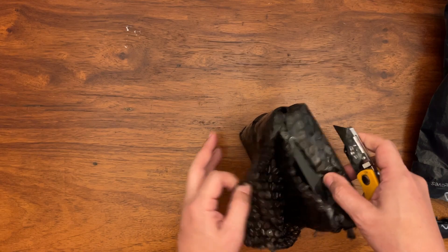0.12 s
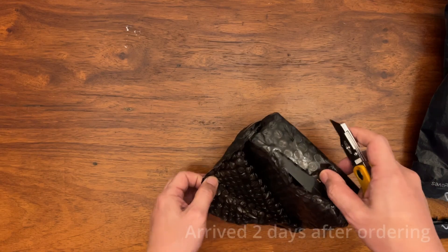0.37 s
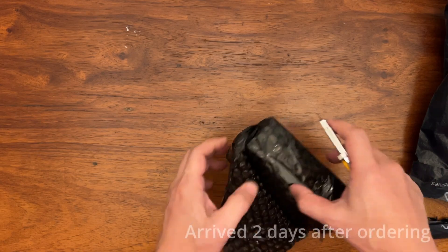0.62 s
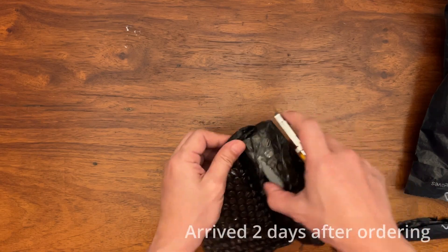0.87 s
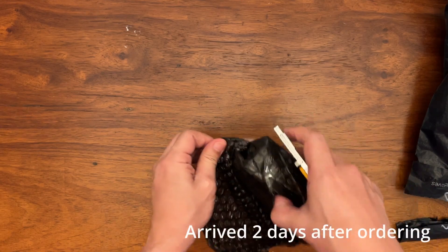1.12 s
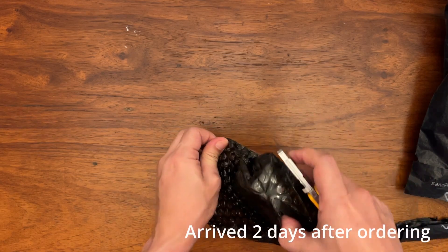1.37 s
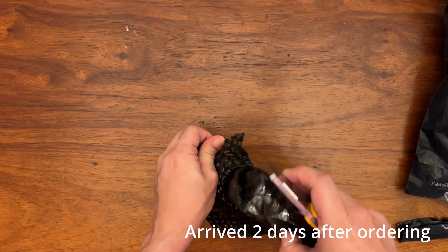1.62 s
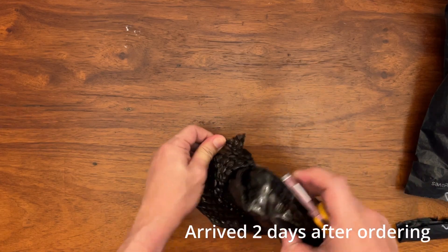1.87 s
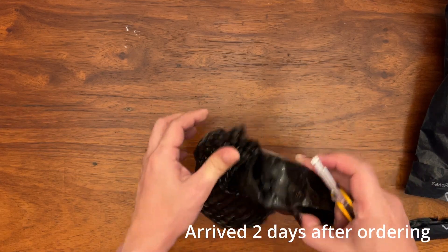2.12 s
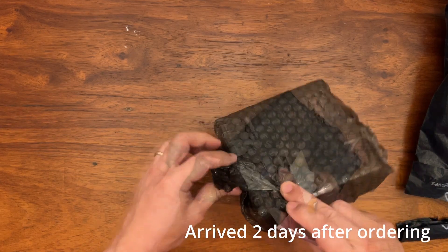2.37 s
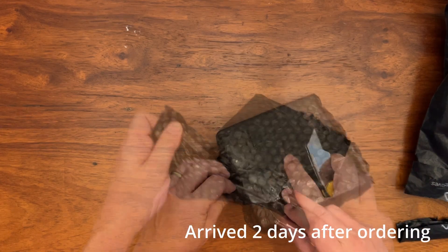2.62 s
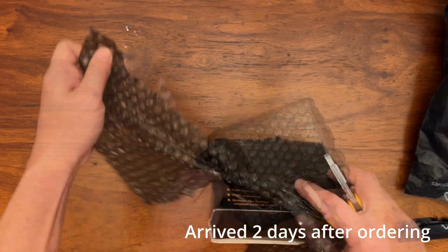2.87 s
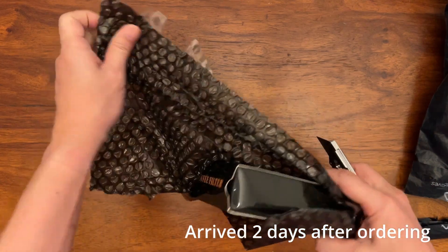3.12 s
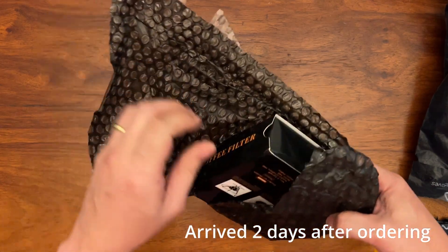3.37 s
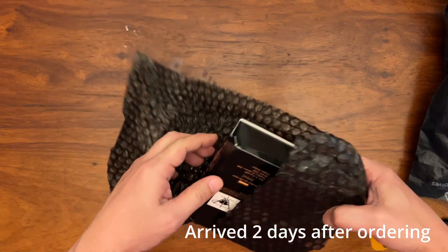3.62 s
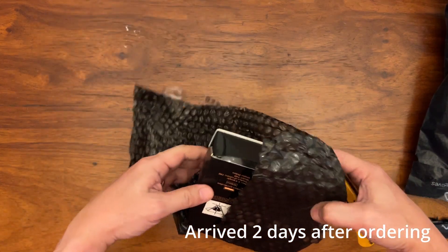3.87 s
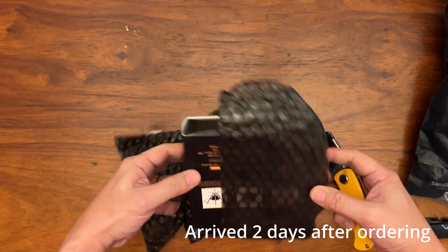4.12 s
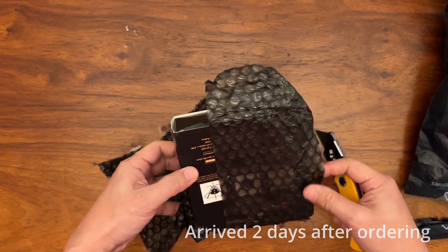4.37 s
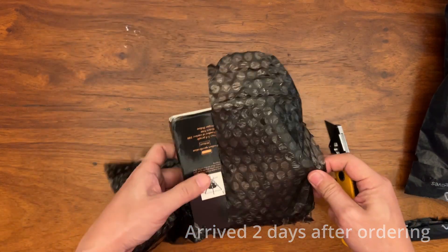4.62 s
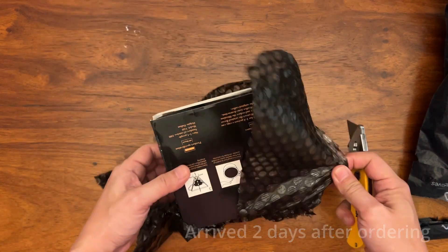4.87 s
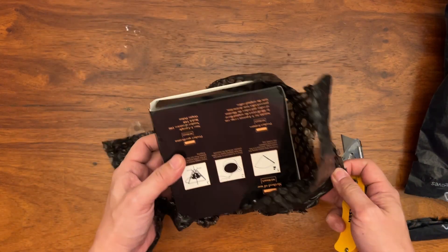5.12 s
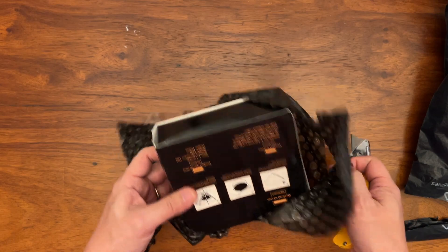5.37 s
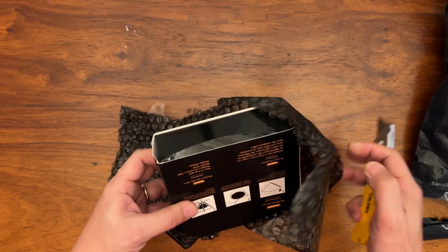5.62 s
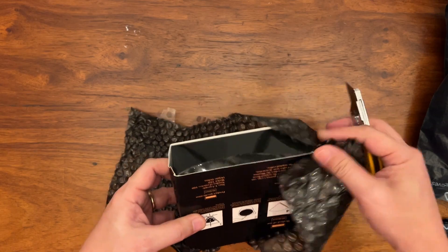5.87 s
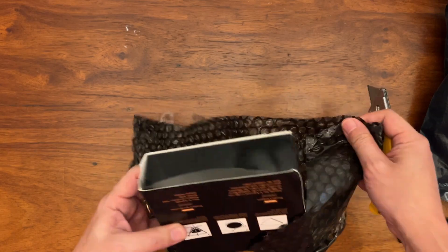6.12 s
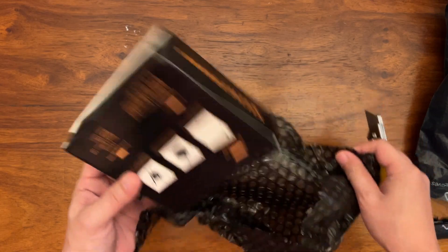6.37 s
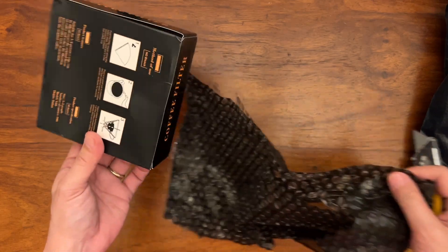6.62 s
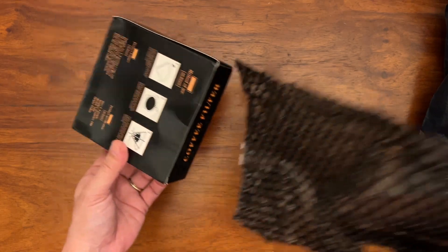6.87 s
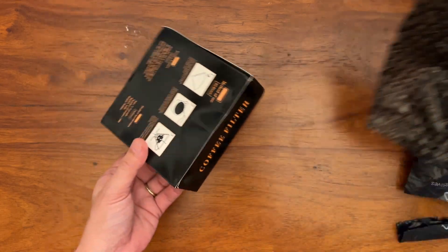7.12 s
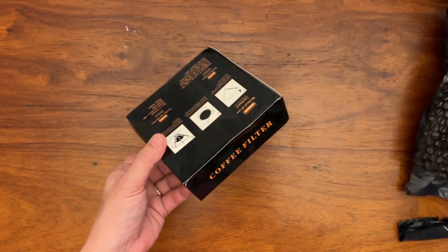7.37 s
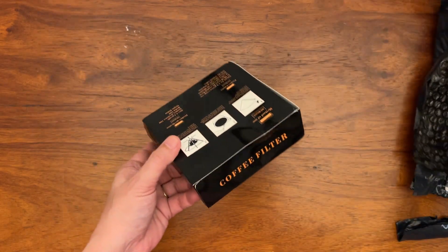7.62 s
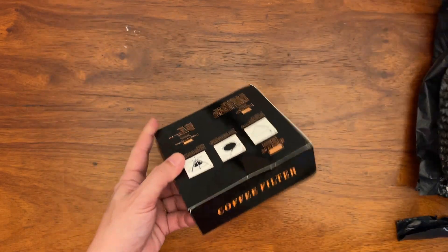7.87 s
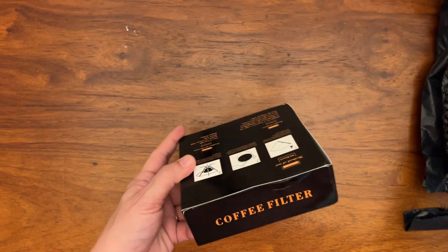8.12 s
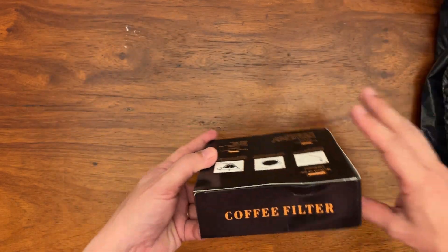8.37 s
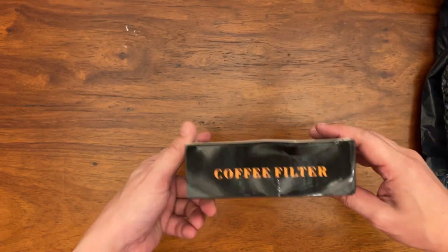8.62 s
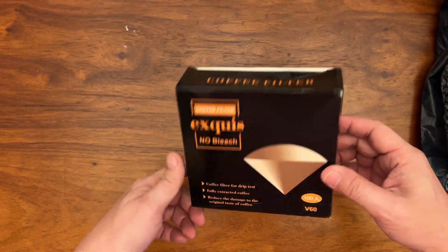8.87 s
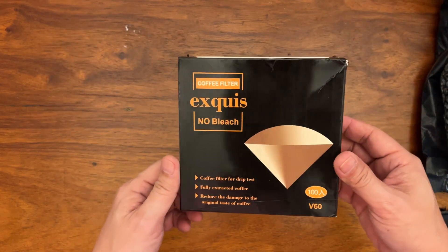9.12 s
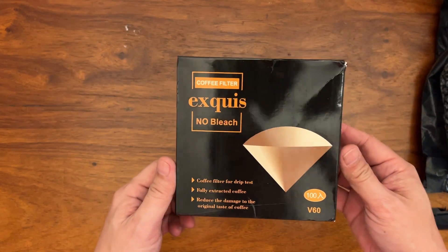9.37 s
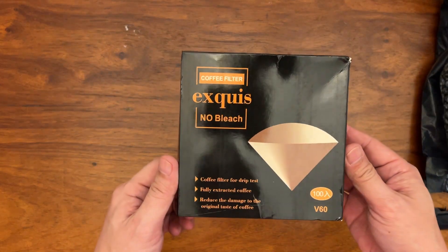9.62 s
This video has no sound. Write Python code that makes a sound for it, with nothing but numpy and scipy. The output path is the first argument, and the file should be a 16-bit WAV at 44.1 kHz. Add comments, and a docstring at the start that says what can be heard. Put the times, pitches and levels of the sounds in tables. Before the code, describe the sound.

Close, sharp crackling of plastic wrapping pulled from a small box, easing into faint rustles and light cardboard thumps in a quiet humming room.

```python
"""A quiet room with a low appliance drone, heard by a close stereo phone microphone: filtered noise.
Hands tear bubble-lined film off a cardboard box above a wooden table, drop the film aside, turn the box over.
Film creases snap singly (shaped noise bursts) and in dense swarms (random clicks through flick shapes).
Snaps, taps and slips set the hollow box thumping (decaying sines); rubbed folds squeak (narrow-band noise)."""
import sys
import numpy as np
from scipy import signal
from scipy.fft import rfft, irfft, next_fast_len
from scipy.io import wavfile
from scipy.ndimage import map_coordinates

SR = 44100
rng = np.random.default_rng(int(sys.argv[2]) if len(sys.argv) > 2 else 0)


def transcribe(u):
    """Save the signal u as a 16-bit wav file named by the first command-line argument.

    u: samples, shape (n,) or (channels, n), limited to [-1, 1]; the rate is SR.
    q: integer samples, one column per channel.
    """
    v = np.clip(np.atleast_2d(u).T, -1, 1)
    q = np.round(v * 32767).astype(np.int16)
    wavfile.write(sys.argv[1], SR, q)


def volts_from_db(level):
    """Convert decibel levels to linear amplitude ratios."""
    exponent = np.asarray(level, float) / 20
    return 10 ** exponent


N = 429964


def rms_one(x):
    """Scale to unit rms."""
    return x / np.sqrt(np.mean(x ** 2) + 1e-20)


def in_time(rows):
    """Columns of a table as curves, one value a sample."""
    s, *columns = np.transpose(rows)
    return [np.interp(np.arange(N) / SR, s, column) for column in columns]


def at_hz(points, hz, axis=1):
    """A table read on a log frequency axis."""
    points = np.array(points)
    return np.interp(np.log(hz + 1), np.log(points[:, 0]), points[:, axis])


def through(x, response):
    """Filter by a response given as a function of Hz."""
    size = next_fast_len(x.shape[-1] + SR)
    hz = np.arange(size // 2 + 1) * SR / size
    return irfft(rfft(x, size) * response(hz), size)[..., :x.shape[-1]]


def band(x, low_hz, high_hz):
    """Causal band-pass."""
    sos = signal.butter(2, [low_hz, high_hz], "band", fs=SR, output="sos")
    return signal.sosfilt(sos, x)


def drift(corner_hz):
    """Slow chance with spread 1: noise through two equal poles, run at SR / 20."""
    pole = np.exp(-40 * np.pi * corner_hz / SR)
    noise = rng.standard_normal(N // 20 + 2002)
    slow = signal.lfilter([1], [1, -2 * pole, pole * pole], noise)[2000:]
    return np.interp(np.arange(N) / 20, np.arange(len(slow)), rms_one(slow))


def pair(mid, side, likeness):
    """Two sides from two unrelated signals, as alike as the table says."""
    alike = lambda hz: np.clip(at_hz(likeness, hz), 0, 1)
    common = through(mid, lambda hz: np.sqrt(1 + alike(hz)))
    opposed = through(side, lambda hz: np.sqrt(1 - alike(hz)))
    return common + opposed * [[1], [-1]]


# room noise spectrum: (frequency [Hz], relative density [dB per Hz])
AIR_SPECTRUM = [(12, -37.5), (20, -8.5), (54, -3), (171, -3.5), (225, -11.5), (298, -11), (491, -17.5),
                (1300, -25.5), (4070, -37), (4550, -34), (10200, -57), (13100, -42), (15500, -59.5)]
# narrow hums and one thin hiss: (centre [Hz], full width at half amplitude [Hz], rms level [dB])
HUMS = [(72, 12, -72), (129.5, 15, -74), (175.5, 7.1, -74), (299.6, 4.4, -74.5), (4550, 190, -89)]
# left-right likeness of the air: (frequency [Hz], correlation [0..1])
AIR_LIKENESS = [(200, 0.9), (400, .75), (700, .05)]
# lowest air swells as the film is waved about: (time [s], relative level [dB])
RUMBLE_SWELL = [(0.0, -102), (2.55, -68), (2.74, -57), (4.43, -67.5), (9.53, -61), (9.75, -72.5)]


def air():
    """Broad room noise plus narrow hums and a swelling rumble, alike on both sides only in the bass."""
    noise = pair(*rng.standard_normal((2, N)), AIR_LIKENESS)
    out = volts_from_db(-67) * rms_one(through(noise, lambda hz: volts_from_db(at_hz(AIR_SPECTRUM, hz))))
    for centre_hz, width_hz, level_db in HUMS:
        hum = through(noise, lambda hz: 1 / (1 + (2 * (hz - centre_hz) / width_hz) ** 2))
        out = out + volts_from_db(level_db) * rms_one(hum)
    swell_db, = in_time(RUMBLE_SWELL)
    rumble = band(pair(*rng.standard_normal((2, N)), AIR_LIKENESS), 22, 99)
    return out + volts_from_db(swell_db - 4) * rms_one(rumble)


def bursts(count, envelope_t60_s, rise_s, evenness):
    """Flick of one crease, one a row: enveloped noise, spectrum partly evened, then faded by the root envelope."""
    t = np.arange(1024) / SR
    swell = (1 - np.exp(-t / rise_s)) ** 2 * volts_from_db(-60 * t / envelope_t60_s)
    tones = rfft(rng.standard_normal((count, 1024)) * swell)
    evened = tones / np.abs(tones) ** np.clip(evenness, 0, 1)
    return irfft(evened) * np.sqrt(swell)


# box modes: (frequency [Hz], relative level [dB], t60 [s])
BOX_MODES = [(226, 0.5, 0.03), (297.3, -2, 0.034), (392.3, 1.5, 0.026), (474, -4.5, 0.042),
             (570, -3.5, 0.059), (656, -1.5, .02), (750, -1, 0.033)]


def thumps(favoured_hz, spread_db, rise_s):
    """Each blow rings all box modes, most those near the favoured pitch; the panels take a moment to swing up."""
    t = np.arange(4096) / SR
    hz, level_db, t60_s = np.transpose(BOX_MODES)[:, :, None]
    modes = volts_from_db(level_db - 60 * t / t60_s) * np.sin(2 * np.pi * hz * t)
    octaves_off = np.log2(hz.T / np.asarray(favoured_hz)[:, None])
    chance = rng.standard_normal((len(favoured_hz), len(BOX_MODES), 2))
    gains = np.sign(chance[..., 0]) * volts_from_db(spread_db * chance[..., 1] - 14.0 * octaves_off ** 2)
    return gains @ modes * (1 - np.exp(-t / np.reshape(rise_s, (-1, 1))))


# hand moves, each a swarm of tiny creases:
# (peak time [s], rise over 20 dB [s], fall over 20 dB [s], rustle level [dB], box shake re rustle [dB])
HAND_MOVES = [(0.03, 0.032, 0.024, -41, -15), (0.1, 0.027, 0.39, -47, -3.5),
              (0.246, 0.11, 0.095, -41.5, -10), (0.484, 0.038, .25, -53.5, -8),
              (0.6, 0.24, 0.093, -59.5, -14), (0.764, 0.033, 0.047, -51.5, -11), (0.96, 0.6, .1, -62, -10),
              (1.06, 0.092, 0.11, -40, -15), (1.197, 0.023, .2, -40, -12), (1.297, 0.36, 0.17, -47, -9),
              (1.427, .035, 0.096, -33.5, -16.5), (1.99, 0.16, 0.038, -50.5, -11.5),
              (2.514, 0.18, 0.22, -53, -11), (2.64, 0.22, 0.43, -53.5, -15.5), (2.72, 0.017, .15, -35, -6),
              (2.76, 0.094, 0.013, -32, -10), (2.8, 0.044, 0.11, -47.5, -2), (3.1, 0.11, 0.14, -45, -9.5),
              (3.49, .15, 0.34, -55.5, -8.5), (3.781, 0.19, 0.22, -53.5, -3),
              (4.141, 0.28, 0.16, -52, -10.5), (4.44, 0.14, 0.13, -49.5, -8.5),
              (4.839, 0.39, 0.11, -46, -10), (4.97, 0.095, 0.17, -50, -5), (5.13, 0.18, 0.17, -67.5, 6),
              (5.562, 0.062, 0.037, -47.5, -11), (5.932, 0.12, .4, -45.5, -11.5),
              (6.093, 0.21, 0.17, -39.5, -5), (6.291, 0.23, 0.092, -45.5, -8), (6.405, .3, 0.32, -50, -9),
              (6.58, 0.33, 0.32, -61, -10.5), (6.924, 0.22, 0.29, -65.5, -8.5),
              (7.28, 0.038, .3, -58.5, -5.5), (7.463, 0.091, 0.37, -51, -11), (7.558, 0.11, 0.22, -56, -7),
              (7.896, .5, 0.17, -51, -7), (8.369, 0.028, 0.073, -73.5, -5.5),
              (8.199, 0.11, 0.16, -69, -9.5), (8.496, .08, 0.17, -66, 4), (8.655, 0.035, 0.16, -69, 10.5),
              (8.849, .2, 0.12, -71.5, 3.5), (9.049, .08, .1, -79.5, 2)]
# film held and creeping: (start [s], end [s], rustle level [dB], box shake re rustle [dB])
FILM_HOLDS = [(1.55, 1.95, -58.5, -12), (2.051, 2.5, -63.5, -12.5), (2.856, 3.05, -55, -10.5),
              (3.19, 3.317, -59.5, -8.5), (3.417, 4.236, -59.5, -13), (5.007, 5.53, -55.5, -12),
              (5.636, 5.66, -63.5, -4), (6.7, 7.22, -81, -3), (7.248, 8.04, -58.5, -5.5)]
HOLD_RISE_S, HOLD_FALL_S = 0.01, 0.18   # over 20 dB
IDLE_DB, IDLE_SHAKE_DB = -86.5, -4   # between moves; shake re rustle


def effort(offset_db, per_shake):
    """Gain of one rustle part: each move or hold swells and fades evenly in dB; their powers add."""
    moves = [(s, s, *rest) for s, *rest in HAND_MOVES]
    holds = [(start, end, HOLD_RISE_S, HOLD_FALL_S, *rest) for start, end, *rest in FILM_HOLDS]
    start, end, rise_s, fall_s, level_db, shake_db = np.transpose(moves + holds)[:, :, None]
    t = np.arange(0, N, 32) / SR
    rising, falling = (t - start) / np.abs(rise_s), (end - t) / np.abs(fall_s)
    shape_db = 20 * np.minimum(0, np.minimum(rising, falling))
    power = np.sum(volts_from_db(level_db + shape_db + per_shake * shake_db) ** 2, axis=0)
    power = power + volts_from_db(IDLE_DB + per_shake * IDLE_SHAKE_DB) ** 2
    return volts_from_db(offset_db) * np.interp(np.arange(N) / SR, t, np.sqrt(power))


def creases(median_per_s, size_db, clump_db):
    """Random clicks in clumps; a few are much bigger than the rest."""
    sizes = volts_from_db(size_db * np.minimum(rng.exponential(1, N), 4.5)) * rng.choice([-1, 1], N)
    chance = median_per_s * volts_from_db(clump_db * drift(25)) / SR
    return sizes * (rng.random(N) < chance)


# film colour: (frequency [Hz], relative response [dB])
FILM_COLOUR = [(700, -7), (1400, -0.5), (2200, 3.5), (3600, -10.5), (5500, -9.5), (7500, -8.5), (9500, 3.5),
               (11500, 5.5), (15500, -6.5)]


def rustle():
    """Creases are dealt to sixteen flick shapes; those dealt to the first four also shake the box."""
    clicks = creases(median_per_s=2600, size_db=2.0, clump_db=3.0)
    dealt = rng.integers(0, 16, N)
    flicks = bursts(count=16, envelope_t60_s=0.009, rise_s=0.0006, evenness=0.25)
    knocks = thumps(np.geomspace(300, 600, 4), spread_db=1.0, rise_s=0.00065)
    film = sum(signal.oaconvolve(clicks * (dealt == k), flicks[k])[:N] for k in range(16))
    film = through(film, lambda hz: volts_from_db(at_hz(FILM_COLOUR, hz)))
    box = sum(signal.oaconvolve(clicks * (dealt == k), knocks[k])[:N] for k in range(4))
    # harder box shake: more film body, less top crackle
    crackle = effort(offset_db=0, per_shake=0) * rms_one(band(film, 2900, 8100))
    body = effort(offset_db=-1.4, per_shake=0.48) * rms_one(band(film, 800, 1980))
    top = effort(offset_db=-7, per_shake=-0.69) * rms_one(band(film, 8500, 14000))
    shake = effort(offset_db=0, per_shake=1) * rms_one(box)
    return crackle + body + top + shake


TICKS_PER_S, TICK_RELATIVE_DB, TICK_SPREAD_DB = 45, -17, 4.0
TICKS_FOLLOW = 0.55   # share of the rustle's swing in dB


def ticks():
    """Lone creases let go by chance, in eight colours, also while the film lies aside and settles."""
    sizes = volts_from_db(TICK_RELATIVE_DB + TICK_SPREAD_DB * rng.standard_normal(N))
    clicks = sizes * (rng.random(N) < TICKS_PER_S / SR)
    dealt = rng.integers(0, 8, N)
    flicks = bursts(count=8, envelope_t60_s=0.006, rise_s=0.00017, evenness=0.28)
    out = np.zeros(N)
    for k, low_hz in enumerate(np.geomspace(900, 9000, 8)):
        flick = band(flicks[k], low_hz, min(4 * low_hz, 17000))
        out += signal.oaconvolve(clicks * (dealt == k), flick / np.abs(flick).max())[:N]
    return effort(offset_db=0, per_shake=0) ** TICKS_FOLLOW * out


# single creases, levels relative:
# (time [s], crack level [dB], brightness: top re crack [dB], box thump level [dB])
CREASE_SNAPS = [(0.0224, -29, 5.5, -35.5), (0.0318, -37, 11, -38), (0.0667, -26.5, 8.5, -29.5),
                (0.076, -21.5, 5.5, -38), (0.1039, -24.5, -5, -30.5), (0.1317, -27.5, 7.5, -36),
                (0.192, -40, 3, -59), (0.2285, -38.5, -30, -38.5), (0.4419, -60, 17, -70),
                (0.4655, -41, -3, -46.5), (0.517, -43.5, 5.5, -55), (0.594, -47, -4, -63),
                (0.8512, -53.5, 8, -69), (0.892, -54.5, 15.5, -57), (1.0027, -43, -6, -42),
                (1.0207, -38, 1, -42), (1.035, -27.5, 0, -44), (1.0514, -32, 7.5, -45),
                (1.0857, -18.5, -9, -34.5), (1.1819, -29.5, 13, -41), (1.1885, -22.5, 1, -40),
                (1.1954, -36, 8, -54), (1.214, -19.5, -1.5, -47), (1.2555, -19, -6, -34),
                (1.287, -25, 6, -28), (1.4092, -18, 3, -23.5), (1.4131, -20, 3, -26),
                (1.4246, -17.5, -8, -71), (1.4318, -14.5, -11, -66), (1.4354, -23, 0.6, -51),
                (1.4565, -21, 3, -29.5), (1.4758, -23.5, 3, -39), (1.622, -29.5, 0.5, -44),
                (1.6468, -52, 16, -49), (1.7443, -41.5, 2, -57), (1.7488, -39.5, -12, -47.5),
                (1.8984, -58, 16, -64), (1.985, -41.5, -19, -40), (2.276, -50, 5.5, -64),
                (2.3715, -52.5, 2, -75), (2.4514, -50.5, 15, -62), (2.6283, -53, 14, -57),
                (2.6855, -29.5, 7, -38), (2.7022, -26, 5, -28), (2.7173, -35, -5, -23.5),
                (2.7306, -32, 9, -21.5), (2.7594, -35.5, 17, -38), (2.766, -21.5, -2, -64),
                (2.7899, -33, 1, -30), (3.03, -46, 5.5, -60), (3.058, -43, 7, -37.5), (3.13, -44, 12, -36),
                (3.4204, -47.5, 5.5, -62), (3.5623, -45, -4, -59), (3.6145, -49, 8, -50.5),
                (3.728, -48, 9, -65), (3.7819, -44, -23, -44.5), (4.005, -44, -1, -42),
                (4.3083, -47, -14, -57), (4.426, -47, -18, -44.5), (4.7808, -47.5, 10.5, -39.5),
                (4.873, -46, -6, -45.5), (4.9564, -37.5, 5, -59), (5.0325, -28, 0, -38),
                (5.0585, -42, 10.5, -32), (5.0872, -43, 0, -40), (5.192, -49, 4, -76),
                (5.2422, -46, 3, -51), (5.356, -42, -1.5, -82), (5.5498, -43.5, -19, -42),
                (5.931, -35, -4, -55), (5.9507, -41, -8, -55), (6.027, -42, 11, -35),
                (6.0417, -34, -2, -59), (6.0468, -46, 11, -30.5), (6.078, -48, 18, -31),
                (6.0853, -37, 4, -44), (6.655, -48, -9, -53), (6.7205, -49, -3, -61), (6.9313, -53, 1, -68),
                (7.037, -43.5, 2.5, -74), (7.0777, -55, 8, -73), (7.096, -52.5, 0, -57),
                (7.1632, -56, 3.5, -71), (7.418, -42, -16, -51), (7.541, -45.5, 2.5, -39),
                (8.059, -46, -11, -55), (8.4978, -48.5, 1, -50), (9.009, -70, 14, -70),
                (9.191, -64, 3, -77.5), (9.3768, -58.5, -4, -66.5), (9.5025, -60, 5, -78.5),
                (9.648, -71.5, 10.5, -78), (9.705, -63.5, -1, -75.5)]
# fingers or table meet the box: (time [s], box thump level [dB], relative nail click level [dB])
BOX_TAPS = [(1.293, -32, -19.5), (2.5111, -40.5, -54), (2.616, -37.5, -38), (3.2325, -31, -65),
            (8.438, -55.5, -51), (8.477, -57, -46), (8.6419, -35, -36.5), (8.6499, -41, -48),
            (8.8427, -63, -46), (8.9061, -53, -49.5), (8.96, -61.5, -53), (9.035, -63, -44.5)]
# the grip changes which box modes speak most: (time [s], favoured frequency [Hz])
GRIP_PITCH = [(0, 400), (1.25, 470), (1.3, 570), (2.72, 456), (2.75, 326), (3.3, 308), (4.0, 489),
              (5.05, 480), (6.1, 400), (8.5, 600), (8.64, 390), (8.85, 650)]
FLAP_FROM_BOX, FLAP_PER_BRIGHTNESS = 0.51, -0.14   # flap level lies between crack and thump
SNAP_RISE_S, TAP_RISE_S = 0.00034, 0.00094   # how fast each sets the box swinging
NAIL_CRACK_DB, NAIL_TOP_DB = -18.5, -8.5   # dull click: upper parts lowered


def snaps():
    """A snap is a crack, a lower film flap, a top crackle and a box thump; a tap is a thump and a dull click."""
    snap_s, crack_db, bright_db, snap_thump_db = np.transpose(CREASE_SNAPS)
    tap_s, tap_thump_db, nail_db = np.transpose(BOX_TAPS)
    flap_db = crack_db + FLAP_FROM_BOX * (snap_thump_db - crack_db) + 1 + FLAP_PER_BRIGHTNESS * bright_db
    s, thump_db = np.r_[snap_s, tap_s], np.r_[snap_thump_db, tap_thump_db]
    body_db = np.r_[flap_db, nail_db] + 1.0
    top_db = np.r_[crack_db + bright_db, nail_db + NAIL_TOP_DB] + 4.5
    crack_db = np.r_[crack_db, nail_db + NAIL_CRACK_DB] + 4.0
    rise_s = np.r_[np.full(len(snap_s), SNAP_RISE_S), np.full(len(tap_s), TAP_RISE_S)]
    count = len(s)
    crack = band(bursts(count, envelope_t60_s=0.0093, rise_s=0.00085, evenness=0.17), 1800, 7500)
    body = band(bursts(count, envelope_t60_s=0.023, rise_s=0.00065, evenness=0.1), 750, 2200)
    top = band(bursts(count, envelope_t60_s=0.009, rise_s=0.0013, evenness=0.23), 8500, 17000)
    thump = thumps(np.interp(s, *np.transpose(GRIP_PITCH)), spread_db=4.5, rise_s=rise_s)
    out = np.zeros(N + 4096)
    for shapes, peak_db in [(crack, crack_db), (body, body_db), (top, top_db), (thump, thump_db)]:
        shapes = shapes / np.abs(shapes).max(axis=1, keepdims=True) * volts_from_db(peak_db)[:, None]
        for at, shape in zip(np.round(s * SR).astype(int), shapes):
            out[at:at + len(shape)] += shape
    return out[:N]


# film position: (time [s], mean left-ear lag [samples])
FILM_PLACE = [(0, 0.5), (5.5, 1.5), (6.3, 3), (7.0, 6.5), (8.2, 5.5), (8.5, 0.5), (9.75, -4)]


def placed(x):
    """The left ear lags as the film moves to the right; the creasing spot wanders over the sheet."""
    lag, = in_time(FILM_PLACE)
    left_at = np.arange(N) - lag - 2.05 * drift(16)
    return np.array([map_coordinates(x, [left_at], order=3), x])


# echo: (frequency [Hz], t60 [s], relative level [dB])
WALL_ECHO = [(200, 0.33, -8.5), (720, 0.23, 4), (1980, 0.39, -3.5), (4970, 0.33, 5.5), (8300, 0.37, -3),
             (14700, 0.13, -8.5)]
# left-right likeness of the echo: (frequency [Hz], correlation [0..1])
ECHO_LIKENESS = [(200, .8), (700, .25), (3000, 0.0)]


def room(x):
    """A noise tail builds up over the first reflections and dies at a rate set by frequency."""
    t, tail = np.arange(SR // 2) / SR, 0
    edges_hz = np.geomspace(100, 18000, 9)
    for low_hz, high_hz in zip(edges_hz, edges_hz[1:]):
        hz = np.sqrt(low_hz * high_hz)
        t60_s, level_db = at_hz(WALL_ECHO, hz), at_hz(WALL_ECHO, hz, axis=2)
        decay = volts_from_db(level_db - 60 * t / t60_s) / np.sqrt(t60_s * SR)
        build_up = 1 - np.exp(-t / 0.0011)
        tail = tail + band(rng.standard_normal((2, len(t))), low_hz, high_hz) * decay * build_up
    return signal.fftconvolve(x[None], pair(*tail, ECHO_LIKENESS), axes=1)[:, :N]


# rubbed film folds: (time [s], length [s], centre [Hz], rms level before fading [dB])
FOLD_SQUEAKS = [(3.715, 0.082, 1900, -62), (4.46, 0.033, 2140, -52.5), (5.08, 0.017, 1820, -49.5),
                (5.658, 0.041, 2150, -62), (8.605, 0.042, 1900, -68)]
SQUEAK_WIDTH_HZ = 410


def squeaks():
    """A fold of film rubs: rough noise in a narrow band, swelling and fading over each rub."""
    out, t = np.zeros(N), np.arange(SR // 4) / SR
    for s, length_s, hz, level_db in FOLD_SQUEAKS:
        noise = band(rng.standard_normal(len(t)), hz - SQUEAK_WIDTH_HZ / 2, hz + SQUEAK_WIDTH_HZ / 2)
        swell = np.sin(np.pi * np.clip(t / length_s, 0, 1))
        at = int(s * SR)
        out[at:at + len(t)] += volts_from_db(level_db) * rms_one(noise) * swell
    return out


def scene():
    """Film and box close by, their echo, and the room."""
    near = rustle() + ticks() + snaps() + squeaks()
    return air() + placed(near) + volts_from_db(3.0) * room(near)


def roll_off(x):
    """The treble ends steeply here."""
    return signal.sosfilt(signal.butter(12, 16780, fs=SR, output="sos"), x)


# microphone ports, left re right: (frequency [Hz], left phase lead [rad], left level [dB])
PORT_COLOUR = [(100, 0.0, 1.3), (1900, 0.0, .5), (3400, 1.4, 1.5), (4400, 1.2, 3.5), (5500, -.9, 3.0),
               (6800, 0.0, .3)]
# treble roll-off: (frequency [Hz], gain [dB])
TREBLE_CUT = [(15650, 0), (16000, -16), (16700, -30), (17000, -60)]
ONE_PORT_HZ, ONE_PORT_LAG_S, ONE_PORT_LEAK_DB = 6560, 0.0001469, -7   # crossover; left lag; left share


def record(dry):
    """Below a crossover the ports colour the sides; above it both come mostly from one port, left a little late."""
    high = lambda hz: 1 / (1 + (ONE_PORT_HZ / (hz + 1)) ** 12)
    ports = lambda hz: volts_from_db(at_hz(PORT_COLOUR, hz, axis=2)) * np.exp(1j * at_hz(PORT_COLOUR, hz))
    late = lambda hz: high(hz) * np.exp(-2j * np.pi * hz * ONE_PORT_LAG_S)
    mostly_right = dry[1] + volts_from_db(ONE_PORT_LEAK_DB) * dry[0]
    left_low = through(dry[0], lambda hz: (1 - high(hz)) * ports(hz))
    left = left_low + through(mostly_right, late)
    mix = through(np.array([left, dry[1]]), lambda hz: volts_from_db(at_hz(TREBLE_CUT, hz)))
    return roll_off(mix)


dry = scene()
out = record(dry)
transcribe(out)
```